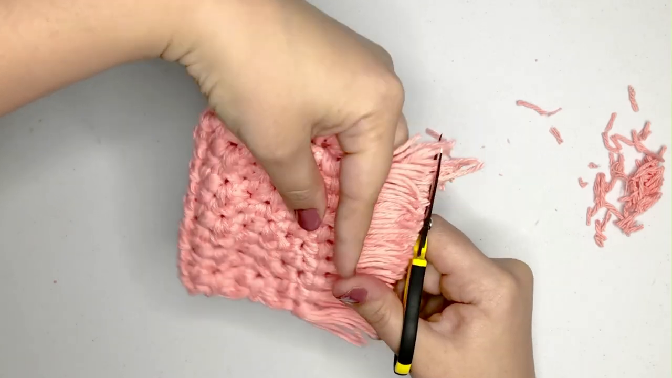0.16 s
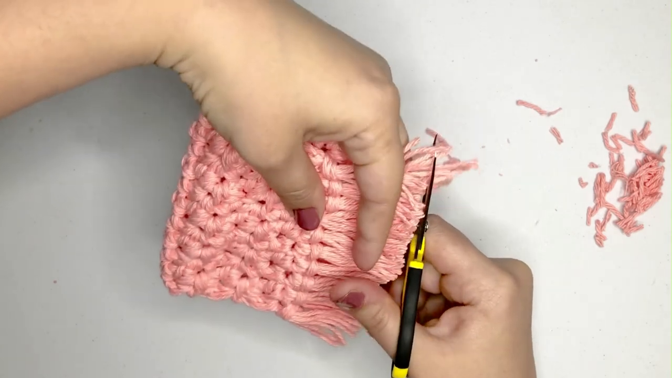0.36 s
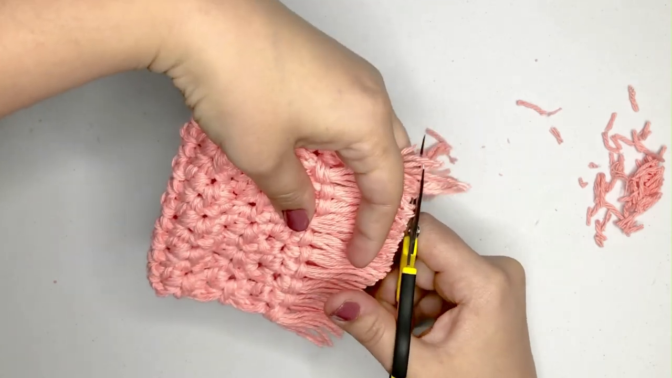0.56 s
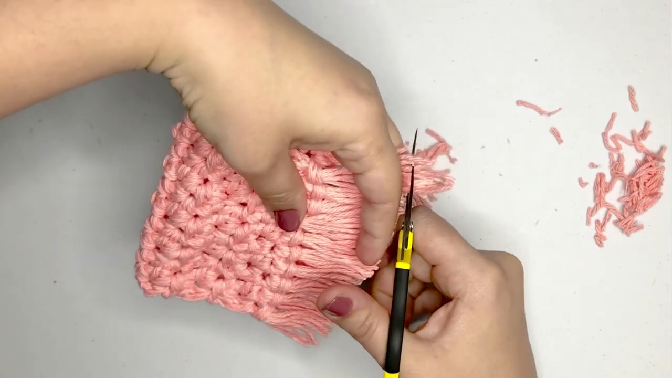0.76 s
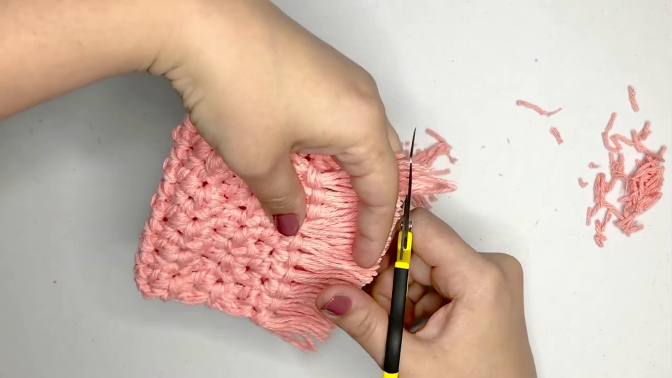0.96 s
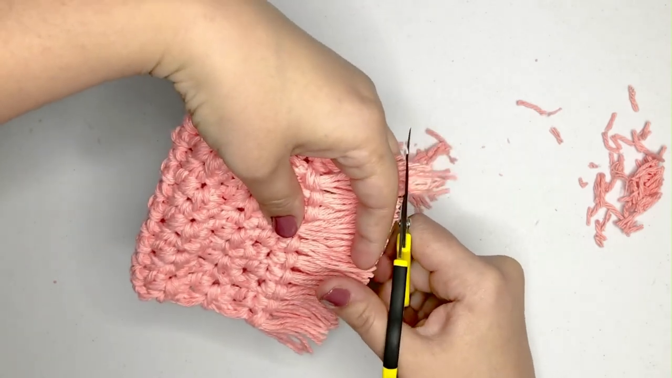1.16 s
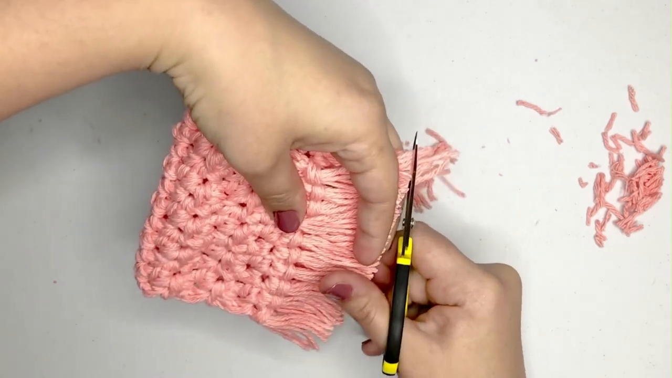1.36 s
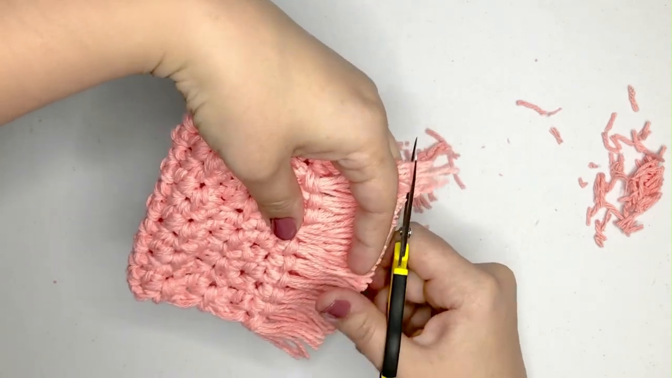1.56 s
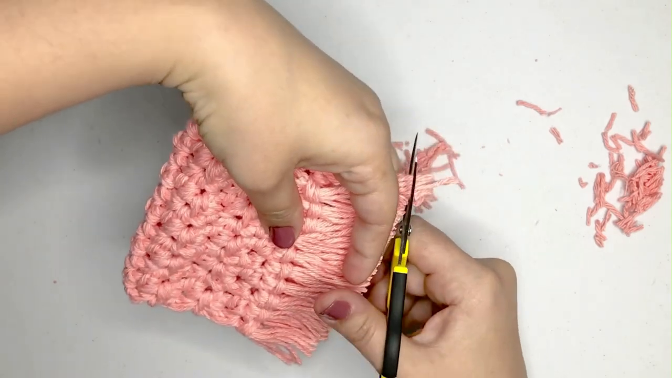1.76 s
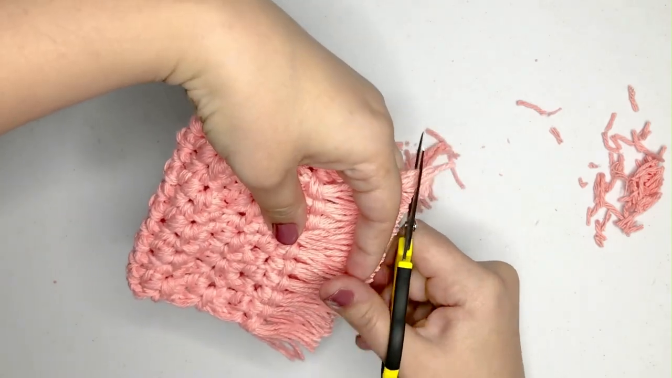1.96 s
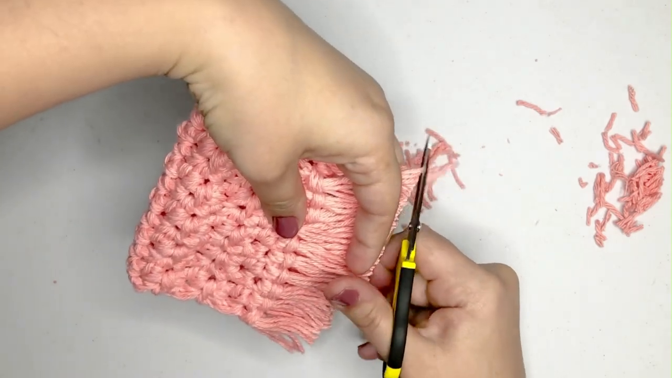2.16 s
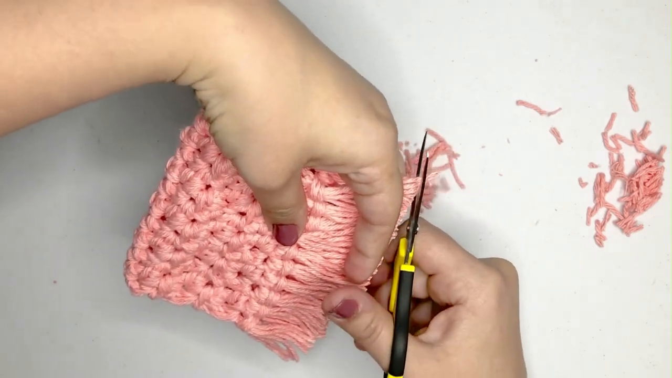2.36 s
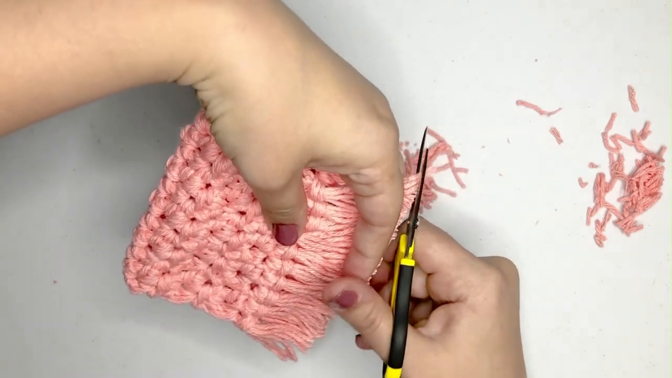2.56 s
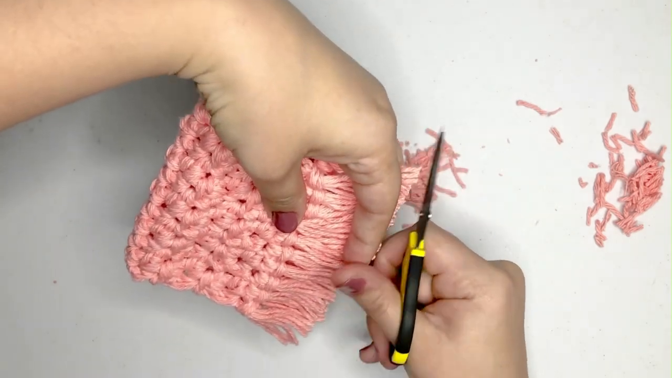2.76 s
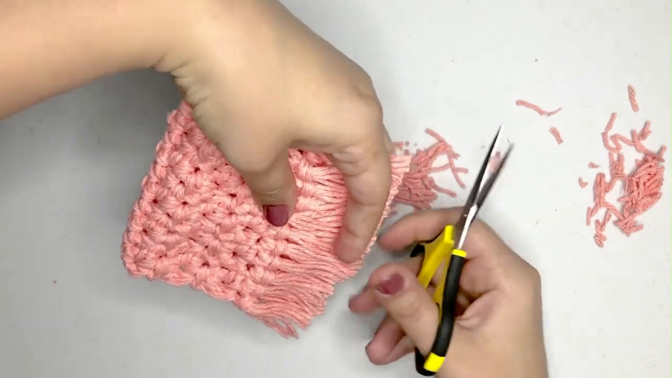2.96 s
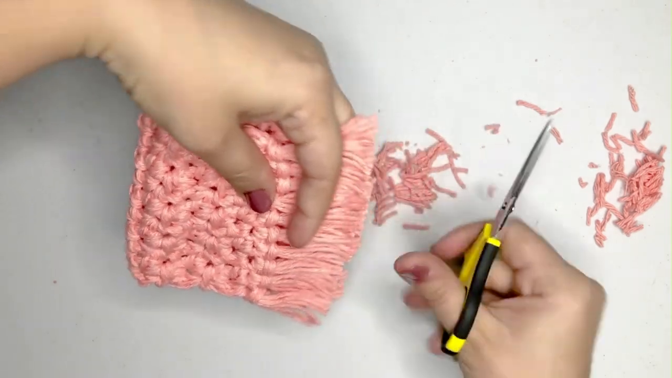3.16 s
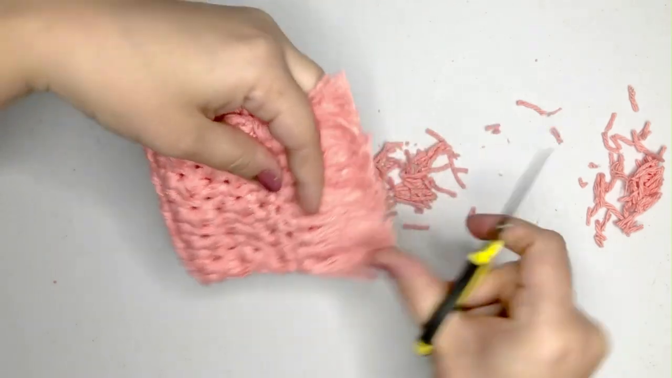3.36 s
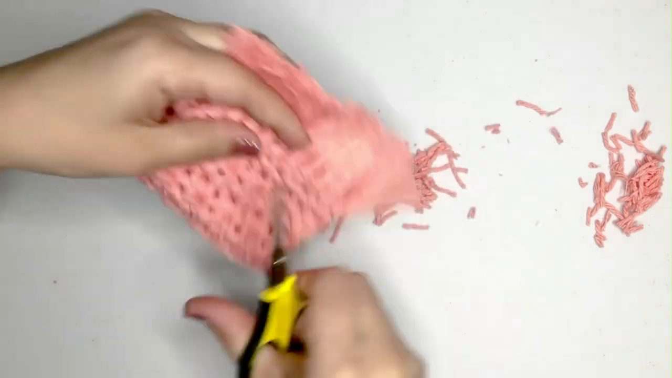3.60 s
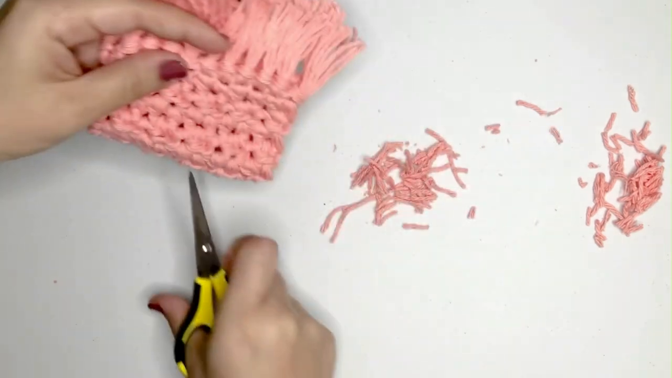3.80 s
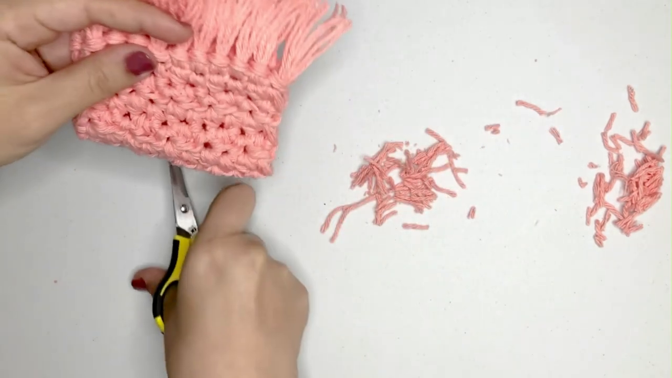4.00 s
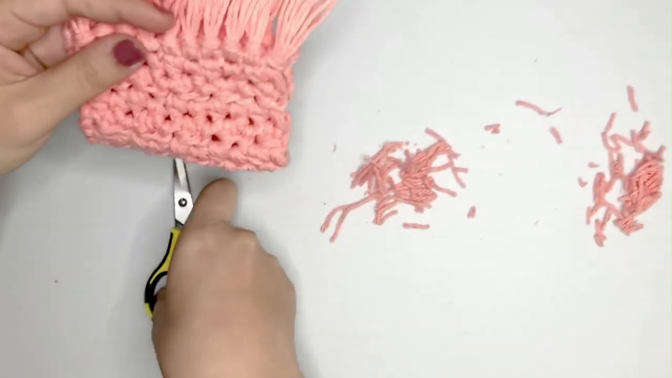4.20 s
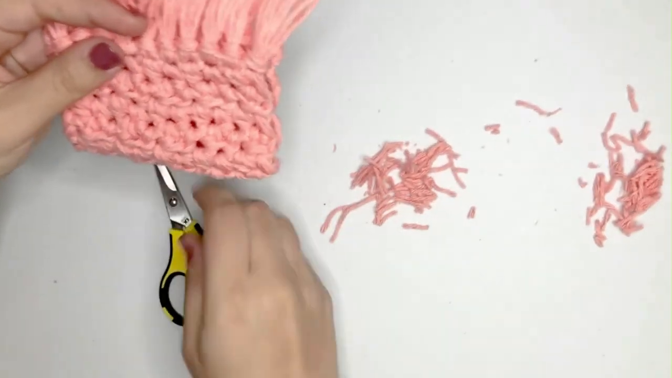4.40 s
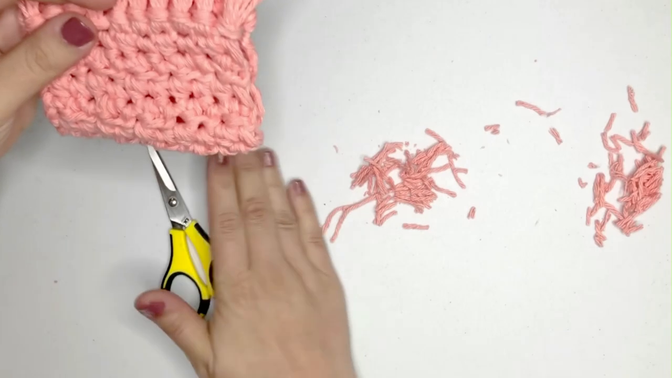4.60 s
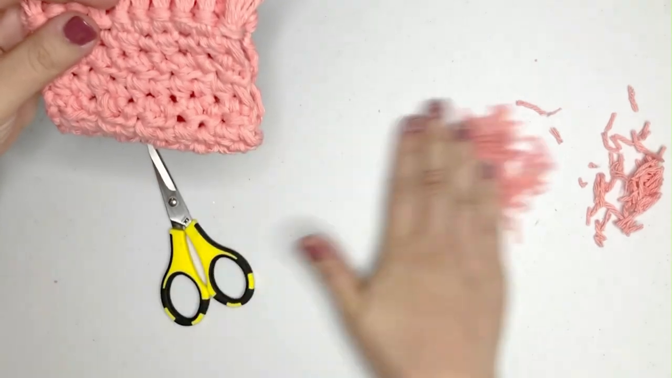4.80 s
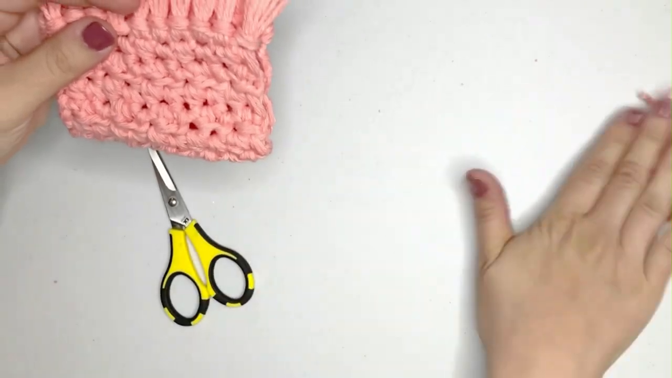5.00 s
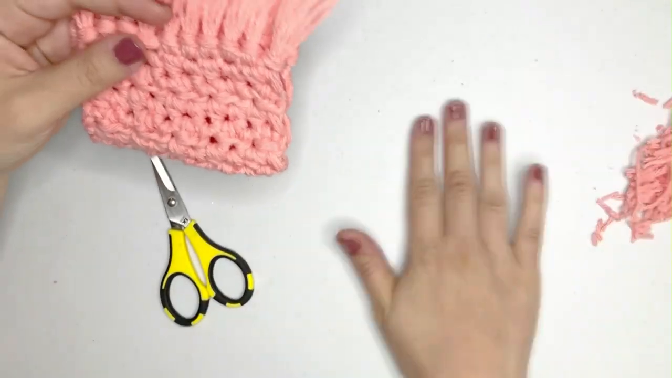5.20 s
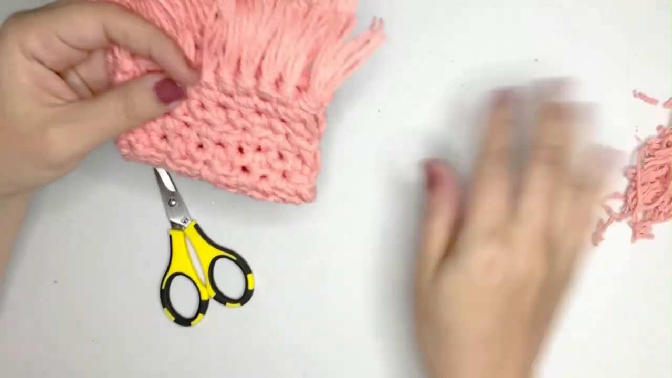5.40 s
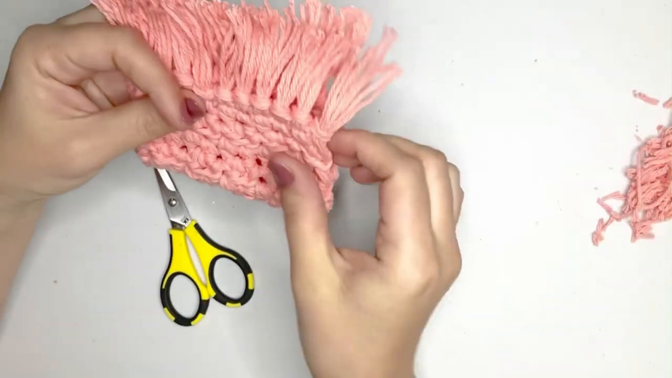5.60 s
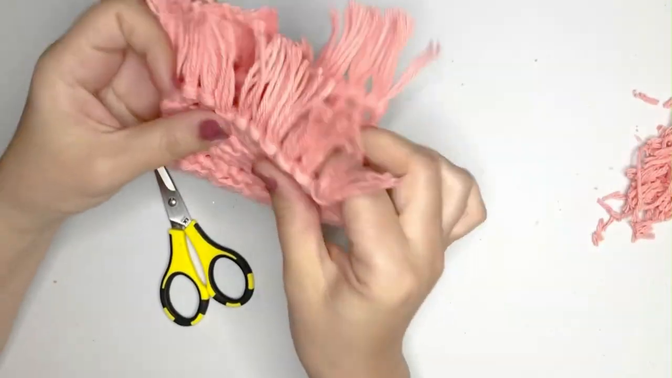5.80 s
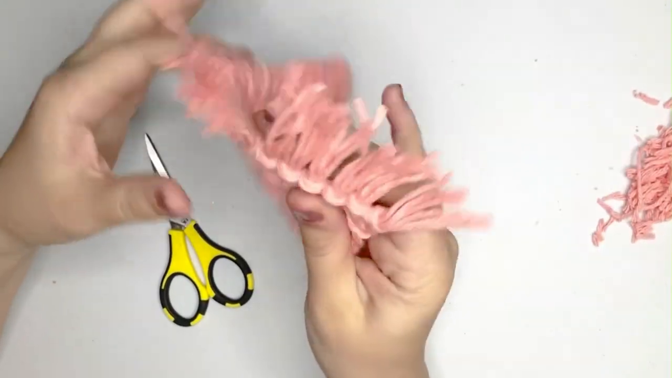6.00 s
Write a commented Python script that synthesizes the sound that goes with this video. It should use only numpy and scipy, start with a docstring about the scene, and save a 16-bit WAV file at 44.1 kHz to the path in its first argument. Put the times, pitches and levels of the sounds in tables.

```python
"""A quiet room with a low hum: small steel scissors trim a yarn fringe close to the microphone.
The blades creak (single slips that tick and ring), swish, crunch through strands (snapping-fibre noise
over a sliding rasp) and clack shut, hardest the last time. Laid on a hollow table they knock and rattle:
each blow rings the modes of table and steel. A hand sweeps the clippings aside twice (friction noise)."""
import sys
import numpy as np
from scipy import signal
from scipy.fft import rfft, irfft
from scipy.io import wavfile
from scipy.ndimage import uniform_filter1d

SR = 44100
rng = np.random.default_rng(int(sys.argv[2]) if len(sys.argv) > 2 else 0)


def to_wav(s):
    """Save 16-bit WAV."""
    ch = np.atleast_2d(s).T  # columns
    pcm = np.round(np.clip(ch, -1, 1) * 32767)  # PCM
    wavfile.write(sys.argv[1], SR, pcm.astype(np.int16))


N = 266805
TIME, FREQ = np.arange(N) / SR, np.fft.rfftfreq(N, 1 / SR)


def amp(db):
    """Turns decibels into a plain multiplier."""
    return 10 ** (np.asarray(db) / 20)


def evened(x):
    """Scales to rms 1."""
    return x / np.sqrt(np.mean(x ** 2) + 1e-30)


def peaked(x):
    """Scales to peak 1."""
    return x / abs(x).max()


def read(points, hz):
    """Reads a table between its points, on a log-frequency axis."""
    f, value = np.transpose(points)
    return np.interp(np.log(hz + 1), np.log(f + 1), value)


def add(mix, s, sound):
    """Mixes a sound in at time s."""
    part = mix[round(s * SR):][:len(sound)]
    part += sound[:len(part)]


def grains(spectrum, spread_db):
    """Friction: a dense stream of tiny impacts of uneven size, coloured by a spectrum."""
    size_db = spread_db * np.clip(rng.standard_normal(N), -3, 3)
    impacts = rng.standard_normal(N) * amp(size_db)
    return evened(irfft(rfft(impacts) * amp(read(spectrum, FREQ)), N))


def band(hz, width_hz):
    """Steady noise gathered in one band, like a resonance that is kept going."""
    resonance = 1 / (1 + (2 * (FREQ - hz) / width_hz) ** 2)
    return evened(irfft(rfft(rng.standard_normal(N)) * resonance, N))


def colour(x, spectrum, tilt_db=0, size=1024):
    """Causal filter with the given spectrum, tilted in dB per octave above 1000 Hz."""
    hz = abs(np.fft.fftfreq(size, 1 / SR))
    octaves = np.log2(np.maximum(hz, 1000) / 1000)
    log_gain = np.log(amp(read(spectrum, hz) + tilt_db * octaves))
    # minimum phase: the filter answers as promptly as its spectrum allows
    taps = np.fft.ifft(np.exp(np.conj(signal.hilbert(log_gain)))).real[:size // 2]
    return signal.fftconvolve(x, taps / np.linalg.norm(taps))


def burst(t60, count=3):
    """A scatter of tiny contacts that dies away, with all frequencies about equally strong."""
    t = np.arange(int(t60 * SR) + 2) / SR
    decay = amp(-60 * t / t60)
    x = rng.standard_normal(len(t)) * decay
    for _ in range(count):
        # level the spectrum, then restore the smooth dying away
        flat = irfft(np.exp(1j * np.angle(rfft(x))), len(t))
        start_level = np.std(flat[:len(t) // 10 + 2])
        x = decay * np.tanh(flat / decay / (2 * start_level))
    return x


def ring(modes, size=22050):
    """Damped modes after a blow, all starting together."""
    t = TIME[:size]
    return sum(amp(db - 60 * t / t60) * np.cos(2 * np.pi * hz * t) for hz, db, t60 in modes)


def struck(modes, favoured_hz=None, place_db=1.5, detune=0.0021):
    """Ring of one blow: every point of contact favours other modes, and the grip shifts them a little."""
    favour_db, favour_octaves = 7, .16  # lift and width of the favoured modes
    hz, db, t60 = np.transpose(modes)
    gain, shift = rng.standard_normal((2, len(hz)))
    lift_db = 0
    if favoured_hz:
        distance = np.log2(hz / favoured_hz) / favour_octaves
        lift_db = favour_db * np.exp(-distance ** 2)
    return ring(zip(hz * (1 + detune * shift), db + lift_db + place_db * gain, t60))


def patchy(x, patch_db, size=(5, 8)):
    """Shifting points of contact make narrow bands swell and fade."""
    z = signal.stft(x, nperseg=512, noverlap=384)[2]
    patches = uniform_filter1d(rng.standard_normal(z.shape), size[0], axis=0)
    patches = evened(uniform_filter1d(patches, size[1], axis=1))
    return evened(signal.istft(z * amp(patch_db * patches), nperseg=512, noverlap=384)[1][:N])


def strokes(rows, attack_s, t60):
    """Gain of rubbing strokes (start_s, length_s, level_db): each rises, holds and dies away."""
    gain = np.zeros(N)
    for s, length, db in rows:
        rise = np.clip((TIME - s) / attack_s, 0, 1)
        after = np.maximum(TIME - s - length, 0)
        gain += rise * amp(db - 60 * after / t60)
    return gain


def glides(rows):
    """Short swells of noise, each in one gliding band."""
    out = np.zeros(N)
    for s, length, db, first_hz, last_hz, width_hz in rows:
        n = int(length * SR)
        flutter = band(0, width_hz)
        # slow random flutter, carried up to the gliding pitch
        turn = np.exp(2j * np.pi * np.cumsum(np.linspace(first_hz, last_hz, n)) / SR)
        tone = (turn * (flutter[:n] + 1j * flutter[-n:])).real
        add(out, s, amp(db) * np.hanning(n) * evened(tone))
    return out


def striped(x, count=6):
    """Short delayed copies give the hand's hiss a fixed, striped colour."""
    spread_s, copies_db = .006, -9
    out = x.copy()
    for share, sign in rng.uniform((.1, -1), (1, 1), (count, 2)):
        add(out, share * spread_s, np.sign(sign) * amp(copies_db) / np.sqrt(count) * x)
    return out / np.hypot(1, amp(copies_db))


def background():
    """Faint hiss, a low drone in narrow bands with one steady hum, and thin high whines."""
    # low drone: pitch_hz, width_hz, level_db
    drone_bands = [(91.4, 8.4, -72), (119.6, 5.2, -79.5), (176.5, 9, -81.5), (355, 29, -86)]
    # steady high whines: pitch_hz, level_db
    whine_bands = [(9000, -91), (10200, -87), (13500, -87)]
    # colour of the quiet room's hiss: frequency_hz, relative_level_db
    air = [(20, -22), (50, -14.5), (90, -8), (145, -11), (350, -13.5), (500, -17), (900, -23),
           (2000, -30.5), (4000, -31.5), (6500, -32.5), (10000, -28), (14000, -26), (16300, -35)]
    hum_hz, hum_db, whine_width_hz, air_db = 349.7, -72, 25, -67.5
    drone = sum(amp(db) * band(hz, width) for hz, width, db in drone_bands)
    hum = amp(hum_db) * evened(np.sin(2 * np.pi * hum_hz * TIME))
    whines = sum(amp(db) * band(hz, whine_width_hz) for hz, db in whine_bands)
    return drone + hum + whines + amp(air_db) * grains(air, spread_db=-2.0)


def slip(ring_hz, t60, tick_db, tick_t60, scatter=0.019):
    """One slip: a bright tick that briefly sets the blade ringing, very high."""
    # colour of the tick: frequency_hz, relative_level_db
    tick_colour = [(1500, -58), (4000, -14), (8000, -14.5), (11000, 4.5), (13500, -4), (16000, 5)]
    kick = burst(tick_t60)
    tick = colour(kick, tick_colour)
    modes = []
    for hz, db in [(ring_hz, 0), (14570, -17)]:  # the second is a weaker mode of the blade
        modes.append((hz * (1 + scatter * rng.standard_normal()), db, t60))
    blade = signal.fftconvolve(ring(modes, size=len(tick)), kick ** 3)[:len(tick)]
    return peaked(peaked(blade) + amp(tick_db) * peaked(tick))


def creaking(jitter=0.05, easing_power=3.1):
    """The blades stick and slip ever more slowly as the hand eases off, down to single ticks."""
    # creaks: start_s, length_s, first_slips_per_s, last_slips_per_s, peak_db, last_ring_hz
    creaks = [(0.413, .082, 250, 100, -45.5, 12800), (1.566, 0.045, 190, 86, -45.5, 13360),
              (2.913, .1, 490, 300, -43, 15100), (3.078, 0.04, 440, 310, -46, 15300)]
    # last lone slips as the blades come to rest: time_s, peak_db
    lone_slips = [(0.5135, -42), (0.542, -38), (.597, -34.5), (0.6641, -33), (1.6134, -42), (1.6274, -43),
                  (1.640, -40.5), (1.6726, -40)]
    # dry ticks of the pivot: time_s, peak_db
    pivot_ticks = [(0.3744, -41.5), (2.194, -42.5), (2.5, -41.5), (3.0507, -49), (3.084, -47)]
    # early slips ring anywhere between the last pitch and this one, later ones settle to the last pitch
    early_ring_hz, settle_s = 15000, 0.031
    rise_s, rise_db = 0.021, 4  # a creak swells as the blades bite
    lone_ring_hz = 13030
    out = np.zeros(N)
    for start, length, first_rate, last_rate, db, last_hz in creaks:
        t = 0
        while t < length:
            ring_hz = last_hz + (early_ring_hz - last_hz) * rng.random() * np.exp(-t / settle_s)
            bite_db = rise_db * min((t / rise_s) ** 2 - 1, 0)
            sound = slip(ring_hz, t60=0.011, tick_db=-4, tick_t60=0.0042)
            add(out, start + t, amp(db + bite_db) * sound)
            rate = first_rate * (last_rate / first_rate) ** ((t / length) ** easing_power)
            t += np.exp(jitter * rng.standard_normal()) / rate
    for s, db in lone_slips:
        add(out, s, amp(db) * slip(lone_ring_hz, t60=0.021, tick_db=-5.0, tick_t60=0.023))
    for s, db in pivot_ticks:
        add(out, s, amp(db) * slip(lone_ring_hz, t60=0.012, tick_db=28, tick_t60=0.012))
    return out


def swishing():
    """As the blades open, steel glides on steel with a thin, very high swish."""
    # swishes: start_s, length_s, level_db
    swishes = [(.42, 0.029, -52), (1.57, 0.029, -55.5)]
    # colour of the swish: frequency_hz, relative_level_db
    swish_colour = [(6000, -43), (10000, -25), (12400, -20), (12900, 7), (14000, -3), (15500, 2),
                    (16300, -14)]
    return grains(swish_colour, spread_db=13.0) * strokes(swishes, attack_s=0.0094, t60=0.21)


def tapping():
    """Small dull taps and rustles that ring faintly, and short low thumps and hums of the table top."""
    # taps and rustles of handles, fingers and palm, some within the knocks: time_s, peak_db, t60_s
    taps = [(0.557, -55.5, 0.064), (3.4003, -39.5, 0.037), (3.406, -42.5, 0.027), (3.41, -45, 0.16),
            (3.889, -57, 0.074), (3.944, -41, 0.051), (4.255, -45, 0.13), (4.518, -55.5, 0.037),
            (5.168, -45.5, 0.062)]
    # colour of the taps: frequency_hz, relative_level_db
    tap_colour = [(150, 5), (400, 6), (1250, 6), (1700, -0.5), (2300, 0.5), (2700, -8.5), (3200, 1.5),
                  (4200, -0.5), (5200, -13.5), (14000, -17)]
    # modes that ring faintly with each tap: pitch_hz, relative_level_db, t60_s
    tap_modes = [(1060, -3, .06), (1290, -4, .08), (3090, -1, 0.19), (3230, -4, .13), (3980, -5, .1)]
    # low thumps and hums of the table top under knocks and hand: middle_s, length_s, peak_db, pitch_hz
    thumps = [(3.43, 0.015, -54, 310), (3.463, .03, -56, 125), (4.001, 0.025, -41, 115),
              (4.082, 0.048, -36, 76), (4.234, 0.096, -28, 103.8), (4.409, 0.049, -51, 105),
              (4.575, 0.096, -47, 51.6), (4.745, 0.04, -48, 72), (4.885, 0.12, -51.5, 143),
              (5.182, 0.026, -39.5, 180), (5.193, 0.041, -27.5, 103.5)]
    ring_db = -13  # against the tap
    out = np.zeros(N)
    for s, db, t60 in taps:
        add(out, s, amp(db) * peaked(colour(burst(t60), tap_colour)))
        add(out, s, amp(db + ring_db) * peaked(struck(tap_modes)))
    for s, length, db, hz in thumps:
        t = TIME[:int(length * SR)] - length / 2
        add(out, s - length / 2, -amp(db) * np.hanning(len(t)) * np.cos(2 * np.pi * hz * t))
    return out


def cutting(fibre_db=3.0, skew=.75):
    """Strands part as short swells of snapping fibres over rasping blades; pitch rises toward the tip."""
    # one row a strand cut: middle_s, length_s, level_db, blade_pitch_hz, brightness_db_per_octave
    snips = [(1.171, 0.015, -49.5, 3230, -0.7), (1.249, .014, -43, 3300, 0.5),
             (1.257, .012, -35.5, 3370, 1.8), (1.289, .015, -37, 3400, 1.2),
             (1.312, .015, -38.5, 3420, 0.7), (1.357, .014, -38, 3540, 1.4), (1.933, 0.015, -49, 3180, 0.2),
             (1.965, .016, -42, 3250, .2), (1.995, .019, -41, 3360, 0.1), (2.0317, .014, -37, 3660, 0.3),
             (2.606, 0.014, -48.5, 3170, -1.5), (2.618, .015, -44.5, 3220, -1)]
    # blade sliding over blade and yarn: start_s, length_s, level_db, singing_against_rasping_db
    slides = [(1.116, 0.078, -62.5, -5), (1.234, 0.093, -61, -2.5), (1.87, 0.018, -60, -6),
              (1.921, 0.085, -58.5, -6.5), (2.591, 0.033, -57.5, -1), (2.799, 0.038, -64.5, -4.5),
              (2.84, 0.02, -58, -11), (2.903, 0.083, -59, -13), (3.084, 0.052, -56.5, -18)]
    # colour of sliding: frequency_hz, relative_level_db
    rasp_colour = [(300, -8), (1500, -3.5), (2400, -6), (4200, -2), (7500, -6), (11000, 1.5), (12500, -1),
                   (15500, 2)]
    # colour of cutting: frequency_hz, relative_level_db
    cut_colour = [(300, -7.5), (1000, -10.5), (1600, -5.5), (2500, -9), (5300, -5), (7300, -8.5),
                  (8400, -7), (11100, -2), (12400, -5), (13500, 2.5), (15500, 3)]
    # the blade's resonance in a cut: multiple_of_its_pitch, lift_db
    blade_lift = [(.76, 0), (.92, 16.5), (1.07, 14), (1.25, 5), (1.55, 0)]
    rasp = patchy(grains(rasp_colour, spread_db=7.5), patch_db=4.0)
    song = band(3300, 730)  # the band in which the sliding blades sing
    out = np.zeros(N)
    for *stroke, song_db in slides:
        out += evened(rasp + amp(song_db) * song) * strokes([stroke], attack_s=0.0047, t60=0.12)
    hz = np.fft.rfftfreq(1024, 1 / SR)
    for s, length, db, blade_hz, tilt_db in snips:
        swell = np.sin(np.pi * np.linspace(0, 1, int(length * SR)) ** skew) ** 2
        snap, size = rng.standard_normal((2, len(swell)))
        fibres = evened(np.sign(snap) * amp(fibre_db * size)) * swell
        spectrum = np.c_[hz, read(cut_colour, hz) + read(blade_lift, hz / blade_hz)]
        add(out, s - length / 2, amp(db) * colour(fibres, spectrum, tilt_db))
    return out


def clacking(snap_t60=0.0055, after_t60=0.058, after_db=-27):
    """The blades snap against their stop and rebound once; the fingers damp the steel at once."""
    # the blades meet their stop: time_s, peak_db
    clacks = [(1.412, -48.5), (2.6675, -34.5), (3.1720, -12.5)]
    # colour of the clack: frequency_hz, relative_level_db
    clack_colour = [(300, -36), (900, -22.5), (1500, -9), (2100, -13.5), (3100, -10), (4400, 0.5),
                    (5700, 1), (7600, -8.5), (8400, -0.5), (11000, -4), (12000, 2.5), (13300, -5),
                    (14500, 4), (16300, -28)]
    # softer clacks than this are duller, by dB per octave for each dB
    plain_db, tilt_per_db = -14, 0.18
    # snap, rebound and faint after-sound: delay_s, relative_level_db, t60_s
    parts = [(0, 0, snap_t60), (.0031, -14, snap_t60), (0, after_db, after_t60)]
    out = np.zeros(N)
    for s, db in clacks:
        tilt_db = tilt_per_db * (db - plain_db)
        for delay, part_db, t60 in parts:
            add(out, s + delay, amp(db + part_db) * peaked(colour(burst(t60), clack_colour, tilt_db)))
    return out


def squeaking():
    """The pivot squeaks hoarsely as the blades swing wide: friction in gliding bands."""
    # squeaks: start_s, length_s, level_db, first_hz, last_hz, width_hz
    squeaks = [(2.97, .016, -60.5, 2250, 2200, 340), (3.088, .04, -66, 1700, 1950, 450),
               (3.095, .05, -66, 2350, 2750, 550), (3.089, .05, -67, 5950, 5450, 500)]
    return glides(squeaks)


def sweeping(uneven_db=0.43, judder_db=0.83, rub_db=-20, rub_power=0.71):
    """Skin brushes the table: a grainy, juddering hiss, and a dull rub that swells and fades less steeply."""
    # loudness of hiss and fizz through each sweep, one curve a sweep: time_s, hiss_level_db, fizz_level_db
    sweeps = [
        [(4.53, -87, -85), (4.594, -53.5, -59), (4.65, -48, -52.5), (4.712, -39, -46), (4.77, -37, -46),
         (4.825, -38, -42), (4.906, -45, -47.5), (4.94, -50.5, -56), (4.985, -79, -92)],
        [(5.164, -88, -72), (5.18, -48.5, -57), (5.205, -41, -47), (5.245, -40.5, -41.5), (5.28, -44, -46.5),
         (5.3, -54, -66), (5.318, -71, -88)],
    ]
    # swells of hiss gathered in one gliding band, the last one faint as the sweep ends:
    # start_s, length_s, level_db, first_hz, last_hz, width_hz
    band_swells = [(4.62, 0.17, -52, 5590, 5940, 600), (4.765, .105, -39.5, 4300, 4850, 1300),
                   (5.18, .16, -53, 2302, 2194, 398), (5.27, 0.068, -58, 3910, 4300, 1100)]
    # wool and skin dragged lightly over the table: start_s, length_s, level_db
    drags = [(3.55, 0.25, -67.5), (3.86, 0.32, -62.5), (4.97, 0.2, -70), (5.35, 0.58, -76)]
    # colours of palm hiss, fine fizz, dull rub and dragged wool: frequency_hz, relative_level_db
    palm_colour = [(300, -32), (900, -21), (1700, -30), (2200, -1.5), (2850, -3.5), (3600, -2.5),
                   (4600, -1.5), (6500, -3), (8300, -6.5), (10500, -15.5), (15000, -49)]
    fizz_colour = [(4000, -35), (8500, 2), (11500, 5), (15500, 7.5), (16300, -38)]
    rub_colour = [(25, -28), (50, -8), (120, 5.5), (220, -8.5), (450, -8), (650, -7.5), (950, -3),
                  (1500, -1), (2500, 5.5), (8000, -36)]
    wool_colour = [(150, -1.5), (400, -1.5), (800, -4), (1800, -12), (3500, -12.5), (6000, -18.5),
                   (14000, -29)]
    pressure = amp(uneven_db * evened(uniform_filter1d(rng.standard_normal(N), size=400)))
    judder = amp(judder_db * evened(uniform_filter1d(rng.standard_normal(N), size=70)))
    hiss = patchy(grains(palm_colour, spread_db=4.5), patch_db=2.5)
    fizz = grains(fizz_colour, spread_db=4.0)
    rub = grains(rub_colour, spread_db=4.5)
    palm = glides(band_swells)
    for sweep in sweeps:
        s, hiss_db, fizz_db = np.transpose(sweep)
        during = (TIME > s[0]) & (TIME < s[-1])
        loud = amp(np.interp(TIME, s, hiss_db)) * during
        fine = amp(np.interp(TIME, s, fizz_db)) * during
        palm += loud * hiss + fine * fizz + amp(rub_db) * loud ** rub_power * rub
    # the palm lands with a light pat for its second sweep
    add(palm, 5.1775, amp(-36.5) * peaked(colour(burst(t60=0.0087), palm_colour, tilt_db=9)))
    wool = grains(wool_colour, spread_db=3.0) * strokes(drags, attack_s=0.059, t60=0.98)
    return striped(pressure * judder * palm) + wool


def knocking(lag=0.00302, crack_t60=0.029, grit_db=-3, chatter_db=-31, chatter_t60=0.34):
    """Each blow cracks and rings the steel, duller if soft; the heavy table top answers a moment later."""
    # scissors meet the table: time_s, thud_peak_db, hardness_corner_hz, crack_level_db,
    # steel_ring_peak_db, pitch_favoured_by_the_point_of_contact_hz
    blows = [(3.889, -47, 443, -57, -70, 3000), (3.944, -31.5, 483, -38.5, -60, 2600),
             (3.978, -40, 220, -70, -80, 3000), (4.0544, -12.5, 704, -14, -35, 2000),
             (4.0632, -25.5, 334, -27, -42, 1450), (4.086, -29, 1100, -50, -28, 3170),
             (4.0955, -38, 900, -50, -39, 3300), (4.106, -32, 700, -42, -45, 3000),
             (4.154, -27.5, 330, -42, -58, 2600), (4.1918, -19, 403, -27.5, -50, 2600),
             (4.1963, -35, 800, -27, -39, 2600), (4.204, -20, 290, -31, -42, 2600),
             (4.218, -34, 250, -44, -56, 2250), (4.272, -22.5, 380, -44, -58, 1450),
             (4.283, -30.5, 410, -46.5, -53, 2000), (4.368, -51, 300, -65, -77, 3000)]
    # table top modes: pitch_hz, relative_level_db, t60_s
    table_modes = [(60.7, -38, .34), (104.4, -15, .3), (121, -14, .28), (155.6, -12, 0.34),
                   (224.6, -0.5, .11), (255, 2, .1), (319, 0.5, .06), (349, -1, 0.074), (372, -6, 0.063),
                   (416.5, -6.5, 0.086), (490, -9.5, 0.14), (662, -13, 0.16), (727, -7.5, .14),
                   (762, -5.5, 0.064), (790, -8, 0.055), (858, -5.5, 0.12), (890, -7, 0.097),
                   (1000, -10, 0.14)]
    # the table top's crowd of weaker modes: frequency_hz, relative_level_db
    board_colour = [(80, -6.5), (220, 3.5), (450, -1), (590, -14.5), (780, -2.5), (1000, -6), (1250, -16.5),
                    (2500, -22), (5000, -54)]
    # how well the table top gives off sound: frequency_hz, relative_level_db
    radiation = [(200, -1), (450, 1), (590, -9), (740, 2.5), (900, 1.5), (1050, -0.5), (1250, -9.5)]
    # modes of the scissors lying on the table: pitch_hz, relative_level_db, t60_s
    steel_modes = [(1435, -2.5, .12), (1960, 0, .14), (2150, -2, .11), (2590, -5, .1), (2845, -11, .14),
                   (3000, -5, 0.089), (3305, -3, .11), (3488, -5, 0.1), (4215, -12, .12), (4700, 1, .13),
                   (4840, -8, .1), (4930, -2, 0.11), (6450, -6, .1)]
    # the steel's hard contact, choked by the table: pitch_hz, relative_level_db, t60_s
    contact_modes = [(1505, -0.5, 0.044), (1983, -10, .05), (2200, -13, .04), (2607, -1, 0.064),
                     (3060, -1, .028), (3580, -10, .035), (4690, -0.5, .021), (4830, -4, .018),
                     (5300, -7, 0.017)]
    # colour of the crack: frequency_hz, relative_level_db
    crack_colour = [(400, -15.5), (590, -12.5), (760, 3.5), (900, 7), (1250, -5.5), (1500, 3), (1750, -4),
                    (2500, 5), (3200, 3), (3800, -5), (4800, 0.5), (5800, -7.5), (6600, -9.5),
                    (9000, -14.5), (15000, -14)]
    # softer cracks than this are duller, by dB per octave for each dB
    plain_db, tilt_per_db = -7, 0.05
    board_db, contact_db = -14.5, -0.5  # against the table modes, against the crack level
    out = np.zeros(N)
    for s, thud_db, corner_hz, crack_db, steel_db, favoured_hz in blows:
        table = peaked(struck(table_modes, detune=0.0071))
        add(table, 0, amp(board_db) * peaked(colour(burst(t60=.13), board_colour)))
        # a softer contact passes less of the treble into the table
        thud = signal.sosfilt(signal.butter(2, corner_hz, fs=SR, output="sos"), table)
        add(out, s + lag, amp(thud_db) * peaked(colour(thud, radiation)))
        add(out, s, amp(steel_db) * peaked(struck(steel_modes, favoured_hz)))
        tilt_db = tilt_per_db * (crack_db - plain_db)
        contact = signal.fftconvolve(struck(contact_modes, favoured_hz), burst(0.00031))
        add(out, s, amp(crack_db + contact_db + 2 * tilt_db) * peaked(contact))
        grit = colour(burst(crack_t60), crack_colour, tilt_db)
        add(out, s, amp(crack_db + grit_db) * peaked(grit))
        # the loose handles chatter on after the blow
        chatter = colour(burst(chatter_t60), crack_colour, tilt_db)
        add(out, s, amp(crack_db + chatter_db) * peaked(chatter))
    return out


def grumbling():
    """The heel of the dragged hand sets the table top grumbling softly."""
    # grumbles: start_s, length_s, level_db
    grumbles = [(4.535, 0.08, -57), (4.675, 0.053, -56), (4.85, 0.052, -59), (5.2, 0.053, -57)]
    # colour of the grumble: frequency_hz, relative_level_db
    grumble_colour = [(30, -22), (60, 1.5), (130, 2), (220, -4.5), (400, -15.5), (510, -4.5), (620, -32),
                      (1500, -45)]
    return grains(grumble_colour, spread_db=5.0) * strokes(grumbles, attack_s=0.018, t60=0.3)


def room(x, size=22050, order=256):
    """A diffuse tail after a short gap, the treble dying first."""
    # how long the room rings: frequency_hz, t60_s
    room_t60 = [(100, 0.42), (500, 0.4), (3000, 0.28), (8000, 0.2), (15000, 0.19)]
    taps = rng.standard_normal(size) * (TIME[:size] > .006)
    hz, t, z = signal.stft(taps, SR, nperseg=order)
    decay = amp(-60 * t / read(room_t60, hz)[:, None])
    tail = signal.istft(z * decay, SR, nperseg=order)[1]
    return signal.fftconvolve(x, tail / np.linalg.norm(tail))[:N]


def scene():
    """Mixes blades, hand and knocks, with the room's answer to each, over the background."""
    blades = creaking() + swishing() + cutting() + clacking() + squeaking()
    hand = tapping() + sweeping() + grumbling()
    knocks = knocking()
    wet = room(amp(-20.0) * blades + amp(-14.5) * knocks + amp(-16.0) * hand)
    return (blades + knocks + hand + wet + background())[None]


def record(dry):
    """The microphone thins the deep bass, and a steep filter removes the extreme treble."""
    thin = signal.sosfilt(signal.butter(3, 36, "high", fs=SR, output="sos"), dry)
    band_limit = signal.firwin(255, 16300, window=("kaiser", 8), fs=SR)
    return signal.oaconvolve(thin, band_limit[None], "same")


dry = scene()
out = record(dry)
to_wav(out)
```